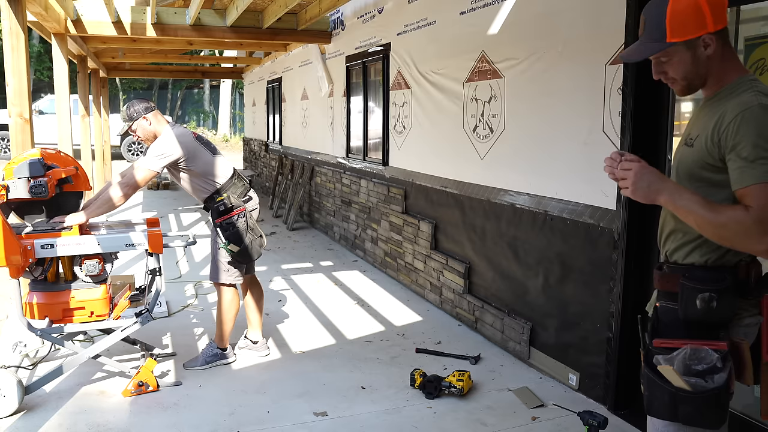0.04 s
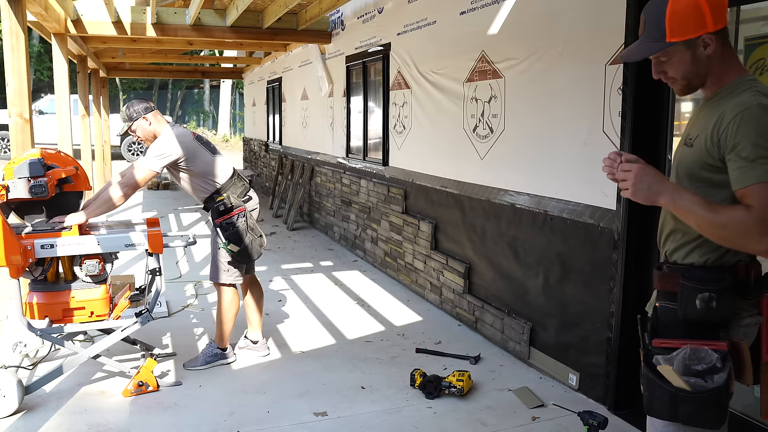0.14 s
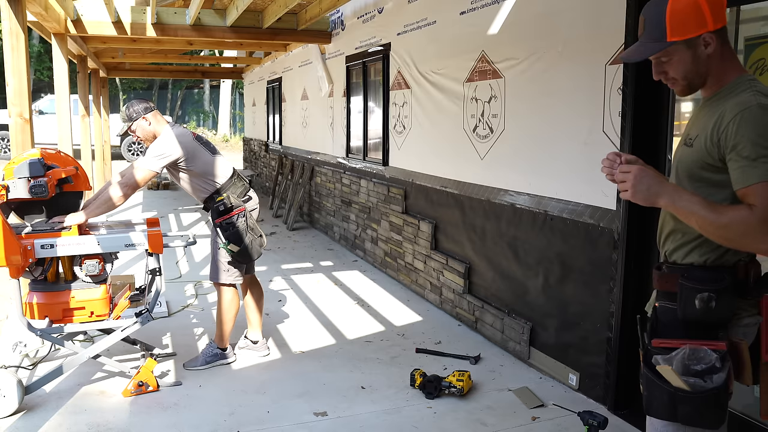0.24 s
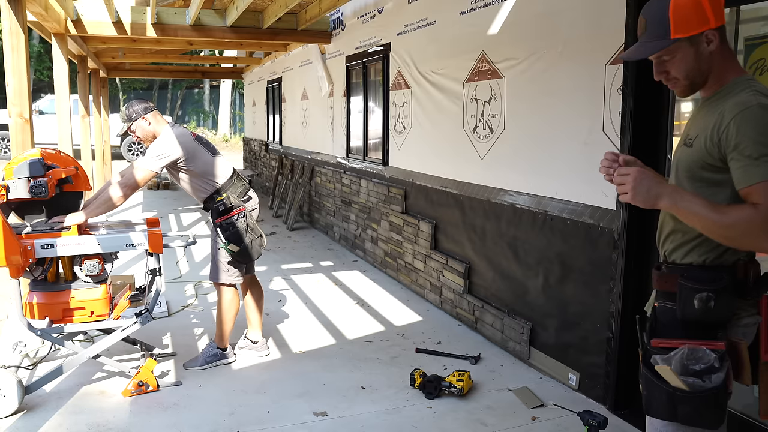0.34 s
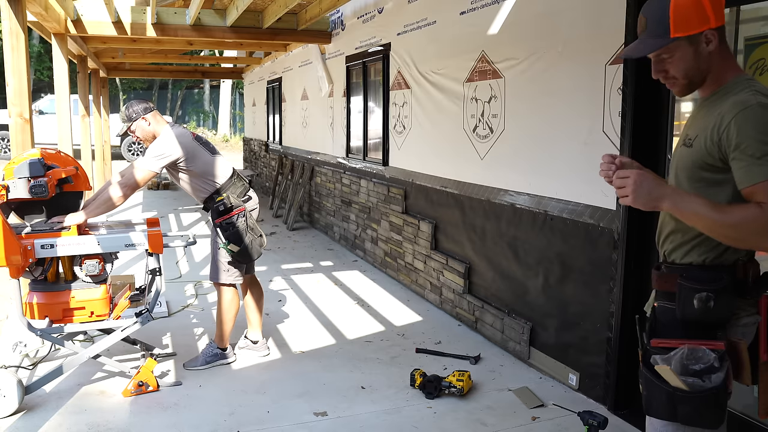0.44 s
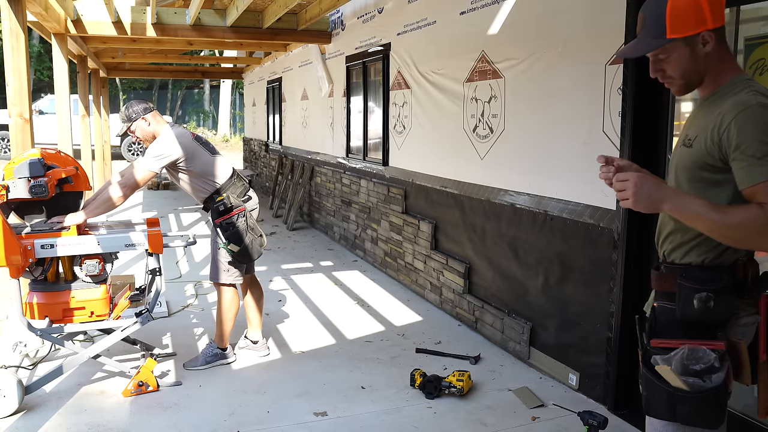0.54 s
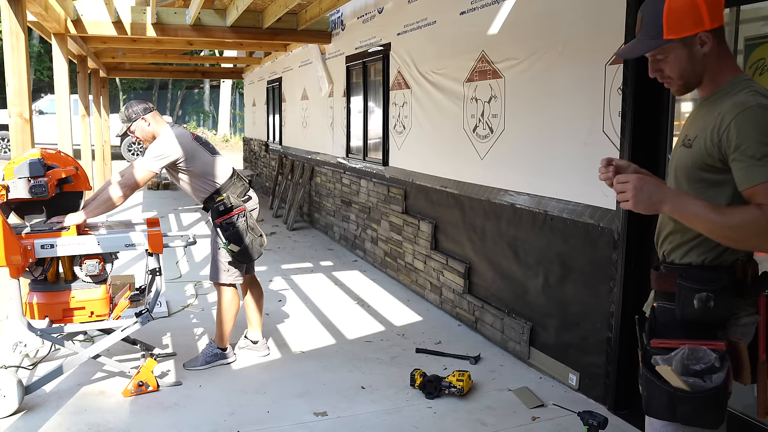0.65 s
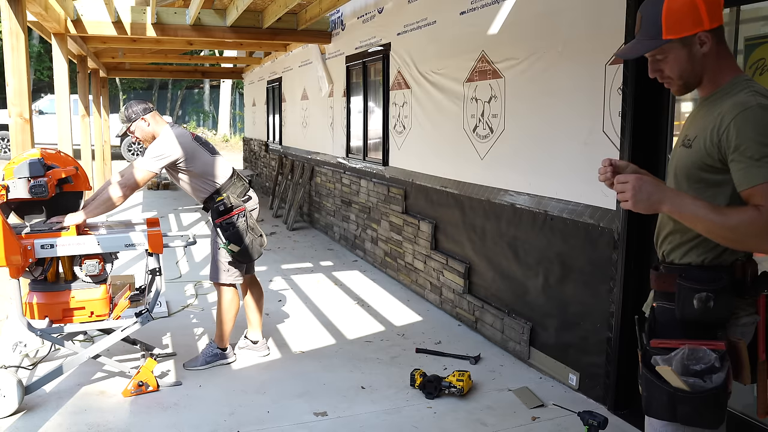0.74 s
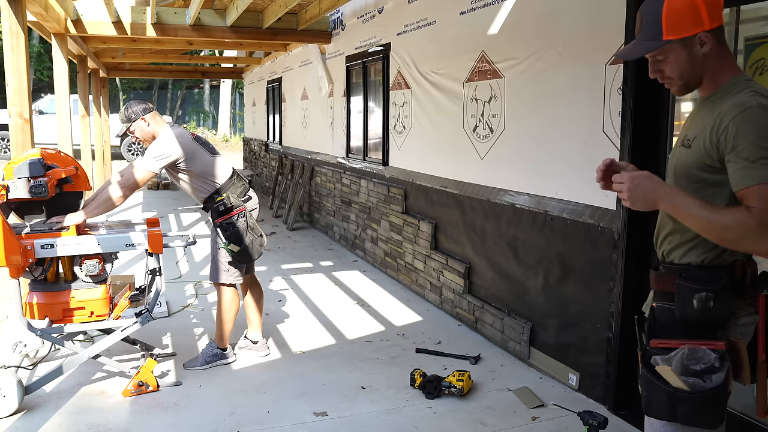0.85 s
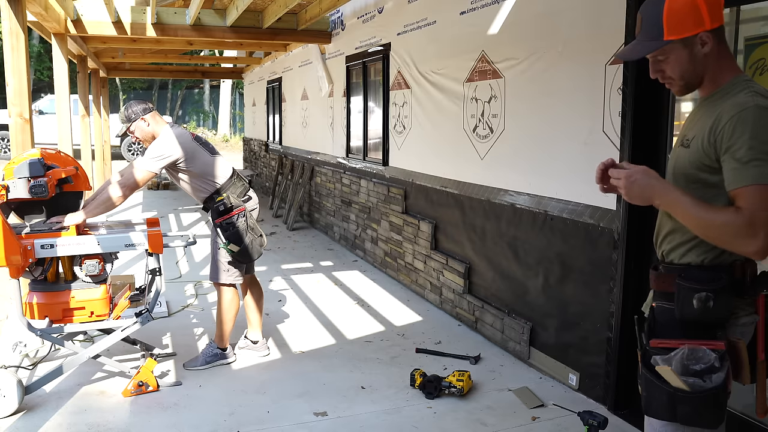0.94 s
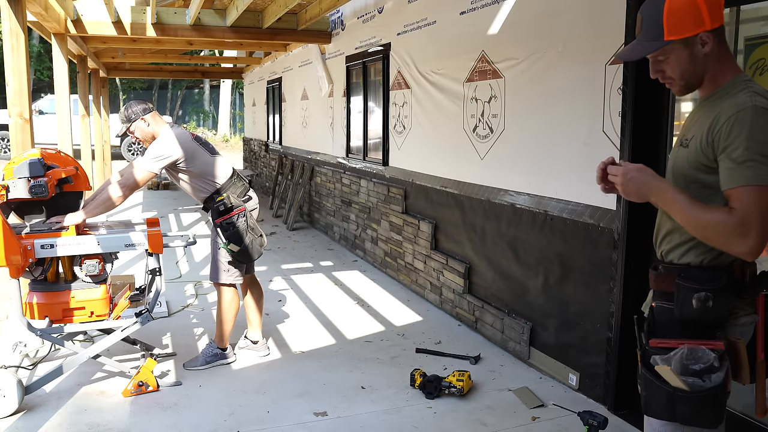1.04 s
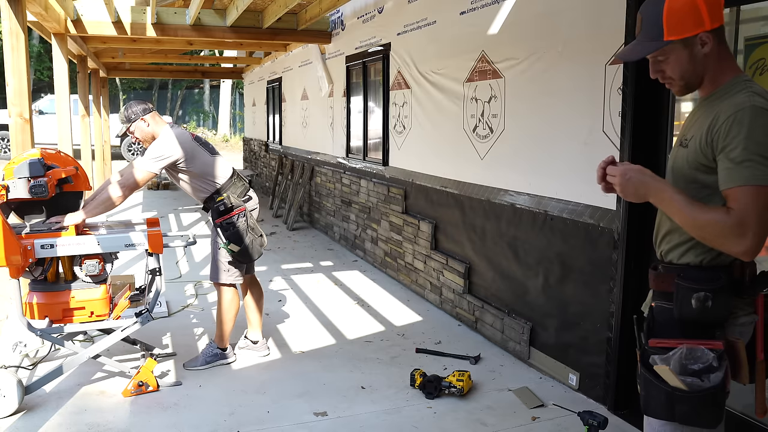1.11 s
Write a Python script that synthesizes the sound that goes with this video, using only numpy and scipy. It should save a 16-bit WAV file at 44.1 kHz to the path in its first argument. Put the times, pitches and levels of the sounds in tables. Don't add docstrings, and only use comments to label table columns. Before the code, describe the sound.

A masonry saw hisses and rings leaving stone, its high whine climbing slightly, then clicks off and coasts down in pitch on a porch.

```python
import sys
import numpy as np
from scipy import signal
from scipy.io import wavfile
from scipy.ndimage import uniform_filter1d

SR = 44100
rng = np.random.default_rng(int(sys.argv[2]) if len(sys.argv) > 2 else 0)


def dump_mix(stems):
    frames = np.atleast_2d(stems).T
    limited = np.clip(frames, -1, 1)
    pcm = np.round(limited * 32767).astype(np.int16)
    wavfile.write(sys.argv[1], SR, pcm)


def level_to_linear(level):
    exponent = np.asarray(level, float) / 20
    return 10 ** exponent


N = 251414
TIME = np.arange(N) / SR
SWITCH_S = 4.405


def evened(x):
    return x / np.sqrt(np.mean(x ** 2) + 1e-20)


def played(rows):
    s, *columns = np.transpose(rows)
    return [np.interp(TIME, s, c) for c in columns]


def curve(times, values):
    return np.interp(TIME, times, values)


def drift(per_s):
    b, a = signal.butter(2, per_s, fs=SR / 32)
    coarse = signal.lfilter(b, a, rng.standard_normal(N // 32 + 2000))[1990:]
    return np.interp(np.arange(N) / 32, np.arange(len(coarse)), evened(coarse))


def resonate(x, hz, width):
    turn = np.exp(2j * np.pi * np.cumsum(hz * np.ones(N)) / SR)
    r = np.exp(-np.pi * width / SR)
    smooth = signal.lfilter([(1 - r) ** 2], [1, -2 * r, r * r], x / turn)
    return 2 * (turn * smooth).real


def rung(modes, wander_db):
    out = 0
    for hz, width, db in modes:
        ringing = evened(resonate(rng.standard_normal(N), hz, width))
        out = out + level_to_linear(db + wander_db * drift(2.8)) * ringing
    return out


def noise(points, patchy_db, scale=1):
    frames, hz = N // 256 + 5, np.fft.rfftfreq(1024, 1 / SR)
    re, im, patches = rng.standard_normal((frames, 513, 3)).T
    patches = uniform_filter1d(patches, size=10, axis=0)
    patches = evened(uniform_filter1d(patches, size=12, axis=1))
    stretch = np.interp(np.arange(frames) * 256, np.arange(N), scale * np.ones(N))
    f, db = np.transpose(points)
    colour_db = np.interp(np.log((hz[:, None] + 1) / stretch), np.log(f), db, -90, -90)
    z = (re + 1j * im) * level_to_linear(colour_db + patchy_db * patches)
    z /= np.sqrt((level_to_linear(colour_db) ** 2).mean(axis=0))
    return evened(signal.istft(z, nperseg=1024, noverlap=768)[1][:N])


def tone(turns, db, waver_db, jitter):
    loudness = np.sqrt(2) * level_to_linear(db + waver_db * drift(16.5))
    return loudness * np.sin(2 * np.pi * turns + jitter * drift(10.2))


def swell(hz, modes):
    power = sum(level_to_linear(db) ** 2 / (1 + (2 * (hz - f) / width) ** 2) ** 2 for f, width, db in modes)
    return np.sqrt(power)


def speed():
    # (time [s], rim segment rate [Hz])
    driven = [(0, 1983), (.3, 1994), (.6, 2020), (1.2, 2098), (1.8, 2158), (2.1, 2190), (2.7, 2261),
              (3, 2291), (3.3, 2314), (3.9, 2351), (4.4, 2378)]
    coast_from_hz, drag_hz, drag_per_s = 2332, 825.9, .2336
    since = (TIME - SWITCH_S).clip(-.03)
    coast = drag_hz * np.tan(np.arctan(coast_from_hz / drag_hz) - drag_per_s * since)
    return np.minimum(played(driven)[0], coast)


def level(rim_hz, free_db, contact_db, share, octave_db):
    # (time [s], contact with the stone [0-1], motor load [dB])
    cut = [(0, 1, 1), (.4, 0.73, -0.5), (.55, 0.78, 0), (.76, 0.6, -.5), (1.27, 0.64, 0), (1.55, 0.7, -1.5),
           (1.95, 0.4, -2), (2.7, 0.22, -2), (3.4, 0.2, -1), (3.75, 0.14, -1), (4.38, 0, -1)]
    contact, load_db = played(cut)
    lost = np.log2(np.maximum.accumulate(rim_hz) / rim_hz)
    return level_to_linear(free_db + contact_db * contact + share * load_db - octave_db * lost)


def rim_whine(blade, rim_hz):
    # (frequency [Hz], width [Hz], level [dB])
    pulling_modes = [(1987, 12, -25), (2008, 12, -28), (2027, 22, -27), (2053, 20, -30.5),
                     (2079, 12, -26.5), (2090, 12, -28), (2099.5, 8, -26.5), (2128, 24, -36),
                     (2152, 24, -38), (2182, 26, -29.5), (2200, 16, -31), (2226, 14, -36), (2261, 8, -37),
                     (2278, 11, -31), (2299, 8, -31.5), (2309.5, 4, -29), (2330, 9, -29), (2339, 5, -33),
                     (2346.5, 8, -28), (2361, 12, -27), (2375, 6, -29.5)]
    # (frequency [Hz], width [Hz], level [dB])
    coasting_modes = [(1220, 160, -46), (1505, 70, -32.5), (1680, 140, -40.5), (2200, 300, -33)]
    # (frequency [Hz], width [Hz], level [dB])
    overtones = [(3986, 20, -40.5), (4025, 40, -43), (4158, 56, -38), (4215, 14, -41), (4256, 30, -41),
                 (4360, 70, -46), (4562, 12, -40), (4595, 16, -46), (4630, 12, -43.5), (4750, 10, -45),
                 (5958, 24, -34.5), (6330, 40, -48), (6570, 40, -43), (6960, 90, -50)]
    pulling = TIME < SWITCH_S + .02
    rim = np.where(pulling, swell(rim_hz, pulling_modes), swell(rim_hz, coasting_modes))
    out = rim * tone(45 * blade, 1.3, .8, .25)
    out += swell(2 * rim_hz, overtones) * tone(90 * blade, np.where(pulling, 2.5, -10), 2.5, .9)
    out += swell(3 * rim_hz, overtones) * tone(135 * blade, np.where(pulling, 0, -14), 2.5, .8)
    return out


def whistles():
    # (time [s], clear whistle [Hz], hoarse whistle [Hz])
    pitches = [(0, 2650, 3230), (.75, 2676, 3245), (1.1, 2688, 3293), (1.7, 2713, 3312), (2.1, 2729, 3355),
               (2.6, 2746, 3445), (2.8, 2754, 3438), (3.1, 2758, 3345), (3.85, 2770, 3350),
               (4.38, 2790, 3250), (4.52, 2725, 3300), (4.8, 2670, 3400)]
    # (time [s], clear whistle [dB], hoarse whistle [dB])
    levels = [(0, -54, -38), (.5, -61, -30.5), (.8, -36.5, -32.5), (1.2, -30, -28.5), (1.32, -23.5, -27),
              (1.37, -30, -31), (1.43, -22, -29), (1.95, -24, -26.5), (2.16, -28.5, -30), (2.3, -25.5, -29),
              (2.8, -28, -25), (2.95, -38, -23.5), (3.07, -35, -26.5), (3.2, -34, -35), (3.8, -33, -27.5),
              (4.2, -38, -27), (4.3, -38, -23), (4.4, -30, -26), (4.5, -26, -35), (4.64, -34, -40),
              (4.8, -49, -61)]
    clear_hz, hoarse_hz = played(pitches)
    clear_db, hoarse_db = played(levels)
    breakup = curve([2.97, 3.07], [0, 1])
    idling = curve([2.95, 3.1, 4.33, 4.42], [0, 1, 1, 0])
    core_turns = np.cumsum(hoarse_hz + 14 * drift(40)) / SR
    core = tone(core_turns, hoarse_db - 2 - 18 * breakup, 1.2, .5)
    clear = (1 - idling) * tone(np.cumsum(clear_hz) / SR, clear_db, 1.1, .5)
    clear += idling * level_to_linear(clear_db) * evened(resonate(rng.standard_normal(N), clear_hz, 170))
    air = rng.standard_normal(N)
    skirt = (1 - breakup) * evened(resonate(air, hoarse_hz, 200))
    skirt += breakup * evened(resonate(air, hoarse_hz, 260))
    return clear + core + level_to_linear(hoarse_db - 4 + 3 * breakup) * skirt


def rubbing(blade, rim_hz):
    # (time [s], depth [0-1], lead [radians])
    throb = [(0, .1, 0), (.3, .15, .2), (.42, .1, -.1), (.62, .1, .3), (.68, .35, .5), (1.1, .33, 1.8),
             (1.45, .2, 1.5), (1.75, .35, 2), (2.2, .3, 1.8), (2.45, .6, 1.3), (2.65, .15, 1.8),
             (3.4, .33, 1.9), (3.75, .08, 1.2), (4.75, .18, -.5), (4.9, .2, -.3), (4.95, 0, -.3),
             (5.7, 0, .5)]
    # (time [s], strength [times the steady hiss])
    rubs = [(.431, .5), (.451, 0.58), (.4745, 1.6), (.4975, 0.82), (.52, 1), (.543, 0.61), (.565, .5),
            (.604, .7), (1.078, .7), (1.274, 0.44), (1.536, 0.54), (4.832, .4), (4.881, .4), (4.935, 0.39),
            (4.9615, 1.4), (4.989, .9), (5.017, .8), (5.048, 1.2), (5.078, .6), (5.109, .4), (5.146, .4),
            (5.173, .7), (5.2, 1), (5.232, 1.4), (5.262, 1), (5.297, 1.1), (5.333, 1.2), (5.362, 1.1),
            (5.395, 1.7), (5.432, 1.5), (5.468, 1), (5.502, 1.1), (5.541, .5), (5.626, 0.3), (5.66, .4)]
    depth, lead = played(throb)
    turn = (blade + (lead + 1.2 + 0.57 * drift(5.8)) / (2 * np.pi)) % 1
    high_spot = turn / .08 * np.exp(1 - turn / .08)
    rub = 1 + 1.44 * depth * (high_spot - .25) * level_to_linear(2.5 * drift(23))
    for s, strength in rubs:
        u = np.maximum(TIME - s, 0) * rim_hz / 45 / 0.088
        rub = rub + 1.32 * strength * u * np.exp(1 - u)
    return rub * level_to_linear(curve([4.9, 5, 5.5, 5.6], [1, -1.0, -1, -4.0]))


def disc_ring(gain):
    # (frequency [Hz], width [Hz], level [dB])
    deep = [(4000, 43, -4.5), (4190, 54, -6), (4290, 30, -5), (4770, 45, -2.5), (5960, 27, -10),
            (7450, 36, -1), (8340, 40, -11), (9320, 80, -8), (10500, 99, -11), (11700, 48, -16),
            (12300, 60, -16), (13000, 71, -12), (14600, 75, -13), (15400, 64, -20)]
    # (frequency [Hz], width [Hz], level [dB])
    leaving = [(3890, 35, 3), (4290, 35, -2), (5380, 110, -4), (5920, 60, -5), (7280, 80, -8),
               (7644, 80, -8), (8340, 50, -6), (9400, 90, -7), (10385, 60, -8), (10635, 60, -10),
               (11720, 60, -12), (12300, 150, -15), (13110, 70, -10), (14600, 80, -6.5), (15480, 70, -9)]
    # (frequency [Hz], width [Hz], level [dB])
    bite = [(6350, 49, -8), (7700, 60, -11), (8950, 70, -14), (9440, 70, -11.5), (10250, 60, -10),
            (11400, 50, -9), (13065, 60, -8)]
    # (frequency [Hz], width [Hz], level [dB])
    idle = [(4640, 200, -8), (7040, 350, -6), (8100, 450, -8), (8550, 350, -10), (9520, 450, -13),
            (11900, 500, -17)]
    deep_db = curve([0, .25, .4, .55, .75], [-3, -2.0, -7.5, -10, -26])
    leaving_db = curve([.3, .6, 1.1, 1.3, 1.65, 1.9, 2.6], [-20, -10, -10, -7.5, -8.5, -18, -40])
    bite_db = curve([.36, .44, .66, .74, 1.0], [-32, -11, -6, -12, -13])
    idle_db = curve([1.7, 2.4, 4.4, 4.9, 5.7], [-10.5, -4.0, -2, 2, 8.5])
    ring = level_to_linear(deep_db) * rung(deep, 2.2) + level_to_linear(leaving_db) * rung(leaving, 1.5)
    ring += level_to_linear(bite_db) * rung(bite, 2.4)
    return gain * ring + level_to_linear(idle_db) * rung(idle, 2.0)


def grit(blade, rim_hz):
    # (frequency [Hz], level [dB per Hz])
    hiss_colour = [(2500, -11.5), (3500, -0.5), (4500, -7), (7000, -12), (10000, -13.5), (13000, -19.5),
                   (15000, -23.5), (16000, -24)]
    rub = rubbing(blade, rim_hz)
    grains = level_to_linear(1.5 * drift(400))
    hiss = level_to_linear(6.5) * noise(hiss_colour, 0.47) * grains * rub
    ring_gain = level(rim_hz, free_db=0.78, contact_db=1.1, share=0.57, octave_db=2.5)
    ring = disc_ring(ring_gain) * abs(rub) ** 0.83
    return level(rim_hz, free_db=-43.5, contact_db=7, share=1, octave_db=14) * (hiss + ring)


def gear_mesh(blade, rim_hz):
    # (frequency [Hz], width [Hz], level [dB])
    pulling_modes = [(1720, 12, -37), (1880, 25, -48), (1860, 14, -44), (1880, 30, -50), (1960, 100, -39.5),
                     (2060, 40, -44), (2160, 24, -52)]
    # (frequency [Hz], width [Hz], level [dB])
    coasting_modes = [(1000, 70, -41.5), (1215, 130, -33), (1370, 70, -38), (1520, 130, -39.5),
                      (1715, 170, -26), (2010, 170, -28.5)]
    mesh_hz = rim_hz * 40 / 45
    pulling = TIME < SWITCH_S + .02
    mesh = np.where(pulling, swell(mesh_hz, pulling_modes), swell(mesh_hz, coasting_modes))
    octave = tone(80 * blade, np.where(TIME < SWITCH_S, -47, -90), 3, .6)
    return mesh * tone(40 * blade, 0, 1.8, .7) + octave


def turn_knock(blade, rim_hz):
    # (frequency [Hz], width [Hz], level [dB])
    modes = [(145, 70, -53), (272, 50, -48), (395, 84, -35), (530, 50, -46.5), (625, 50, -47),
             (850, 22, -38), (910, 50, -45), (1076, 12, -42), (1640, 40, -43), (1855, 40, -46),
             (4240, 40, -43), (4730, 40, -43)]
    orders = list(range(1, 25)) + [40 / 7, 8.5, 37, 42, 96, 107]
    bite_db = curve([0, .4, .62, .75, 1.1, 1.5, 2.6, 3.2, 4.4, 4.6],
                    [-2.5, -0.6, 2.0, -4, -4, -7.5, -9.0, -6.5, -12, -22.5])
    out = np.zeros(N)
    for k in orders:
        thirds_db = 1.37 * (k % 3 == 0) + 0.6 * (k == 8.5)
        out += swell(k * rim_hz / 45, modes) * tone(k * blade + rng.random(), bite_db + thirds_db, 2.1, 0.32)
    return out


def coasting_motor(blade, rim_hz):
    main_orders = [1, 2, 5, 6, 10, 14, 18, 20, 22, 48, 49, 50, 56, 106]
    # (frequency [Hz], width [Hz], level [dB])
    main_modes = [(150, 50, -59), (400, 200, -50), (850, 200, -52), (860, 70, -48), (2340, 400, -42),
                  (2200, 600, -51), (3400, 300, -48), (2860, 300, -56), (3600, 600, -53), (6900, 500, -68),
                  (7500, 2000, -60), (8000, 1800, -63), (8000, 500, -56), (15300, 800, -75)]
    # (order [times the motor rate], frequency [Hz], width [Hz],
    # level [dB])
    further = [(3, 430, 60, -55), (8, 1250, 300, -43.5), (10.5, 1520, 120, -46), (9, 1380, 100, -49),
               (11, 1840, 200, -48), (13, 2000, 200, -50), (13, 2700, 250, -52), (14, 3270, 300, -48),
               (15.75, 4200, 500, -47), (15.75, 3150, 600, -48), (16, 2560, 450, -45.5),
               (16, 3000, 300, -49), (16, 3740, 300, -49), (19, 4300, 700, -50), (20, 3500, 350, -45),
               (20, 4200, 300, -54), (21, 3900, 800, -54), (22, 4350, 700, -55), (23.625, 4900, 500, -59),
               (24, 3430, 200, -58), (26, 3980, 300, -57), (28, 4680, 400, -62), (29, 4150, 250, -58),
               (32, 5950, 600, -62), (32, 4900, 400, -63), (35, 5300, 500, -65), (37, 6880, 500, -66),
               (41, 7000, 1400, -66), (42, 7200, 1300, -62), (44, 6290, 400, -69), (46, 7350, 900, -66),
               (47, 6800, 600, -66), (48, 8000, 600, -65), (51, 7650, 900, -64), (52, 7430, 400, -72),
               (54, 8100, 800, -67), (55, 8100, 900, -69), (56, 9000, 1200, -63), (58, 8600, 900, -73),
               (62, 9200, 900, -73), (65, 9600, 1000, -73), (66, 9450, 500, -71), (66, 11000, 700, -73),
               (70, 10700, 700, -74), (72, 11000, 700, -76), (78, 11150, 700, -75), (85, 12600, 1400, -74)]
    coast_db = curve([4.4, 4.6], [-30, 1.5])
    pairs = list(zip(main_orders, main_modes)) + [(k, mode) for k, *mode in further]
    out = np.zeros(N)
    for k, mode in pairs:
        out += swell(k * rim_hz * 8 / 63, [mode]) * tone(k * blade * 40 / 7, coast_db, 2, .5)
    return out


def air_rush(rim_hz):
    # (frequency [multiple of the rim rate], level [dB])
    air_colour = [(.7, -19), (.95, -11), (1.1, -1.5), (1.25, 4.5), (1.42, 2), (1.55, -6.5), (2.1, -13.5),
                  (3.2, -23)]
    # (frequency [Hz], width [Hz], level [dB])
    guard = [(1524, 64, 13), (2050, 110, 13), (2145, 120, 11.5), (2820, 290, 3), (2800, 230, -34)]
    rush = level(rim_hz, free_db=-21, contact_db=-5.5, share=0.76, octave_db=11.5)
    rush = rush * level_to_linear(-4.5) * noise(air_colour, 1.0, rim_hz)
    off_db = curve([4.5, 4.7], [0, -3])
    return rush + sum(level_to_linear(db - 14.5 + off_db) * resonate(rush, hz, width) for hz, width, db in guard)


def motor_roar(rim_hz):
    # (frequency [Hz], level [dB per Hz])
    roar_colour = [(29, -51), (50, -27), (211, -15.5), (385, -11), (502, -8), (812, -3.5), (1110, -6),
                   (1190, -1), (2230, -3.5), (2760, -6), (3270, -6), (3690, -6), (12300, -33.5),
                   (15600, -38)]
    # (frequency [Hz], width [Hz], level [dB])
    housing = [(865, 73, -17), (1200.3, 35, -12.5), (1636, 76, -16.5), (3540, 130, -34)]
    body = level_to_linear(8.5) * noise(roar_colour, 0.24) + level_to_linear(4.0) * rung(housing, 3.3)
    return level(rim_hz, free_db=-34, contact_db=-2.3, share=1.3, octave_db=10) * body


def table_rumble(rim_hz):
    # (frequency [Hz], width [Hz], level [dB])
    table = [(165, 43, -15.5), (277.5, 21, -7), (341, 18, -5.5), (390.4, 29, -3), (453, 51, -8.5)]
    # (frequency [Hz], width [Hz], level [dB])
    frame = [(431, 45, -49), (144.3, 94, -57)]
    freed_db = curve([SWITCH_S, 4.55], [0, -12])
    rumble = level(rim_hz, free_db=-35.5, contact_db=-3.5, share=2.5, octave_db=11)
    rumble = rumble * level_to_linear(freed_db - 5.5) * evened(rung(table, 0.95))
    frame_db = curve([4.4, 4.75, 5.7], [-4, 0, -3])
    return rumble + level_to_linear(frame_db) * (TIME > SWITCH_S) * rung(frame, 1.3)


def switch():
    t = np.maximum(TIME - SWITCH_S, 0)
    u = np.maximum(TIME - SWITCH_S + .012, 0)
    sparks = evened(resonate(rng.standard_normal(N), 8000, 4000)) + .4 * rng.standard_normal(N)
    puff = level_to_linear(-42.5) * sparks * (t / 0.0068) * np.exp(1 - t / 0.017)
    thud = level_to_linear(-55.5) * np.sin(2 * np.pi * 150 * t) * (t / 0.046) * np.exp(1 - t / 0.053)
    jolt = level_to_linear(-32) * np.sin(2 * np.pi * 315 * u) * (u / 0.0095) * np.exp(1 - u / 0.013)
    return puff + thud + jolt


def mains_hum():
    return tone(120 * TIME, np.where(TIME < SWITCH_S, -57.5, -90), 1.5, 0.2)


def breeze():
    # (frequency [Hz], level [dB per Hz])
    wind_colour = [(15, -6), (35, -1), (55, -5), (70, 0), (200, -57)]
    # (time [s], length [s], level [dB])
    gusts = [
        (.54, 0.63, -62),
        (1.98, 0.4, -57),
        (2.65, 0.18, -56),
        (3.7, 0.91, -55.5),
        (4.3, 0.33, -64),
        (4.7, 0.15, -54),
        (5.026, 0.13, -49),
        (5.3, .15, -61),
        (5.61, 0.14, -53.5),
    ]
    strength = level_to_linear(-81)
    for s, length, db in gusts:
        strength = strength + level_to_linear(db) * np.exp(-((TIME - s) / length) ** 2)
    return strength * level_to_linear(1.0 * drift(4.4)) * noise(wind_colour, 0.99)


def scene():
    rim_hz = speed()
    blade = np.cumsum(rim_hz / 45) / SR
    saw = rim_whine(blade, rim_hz) + whistles() + grit(blade, rim_hz)
    saw += gear_mesh(blade, rim_hz) + turn_knock(blade, rim_hz) + coasting_motor(blade, rim_hz)
    saw += air_rush(rim_hz) + motor_roar(rim_hz) + table_rumble(rim_hz) + switch()
    return np.tile(saw + mains_hum() + breeze(), (2, 1))


def top_cut(x):
    return signal.sosfilt(signal.butter(12, 15740, fs=SR, output="sos"), x)


def record(dry):
    return top_cut(dry)


dry = scene()
out = record(dry)
dump_mix(out)
```